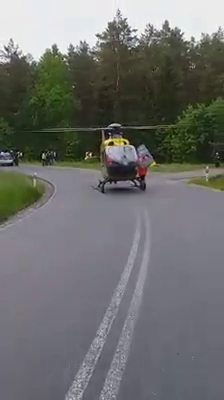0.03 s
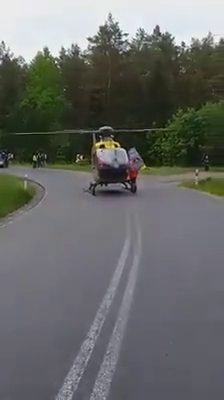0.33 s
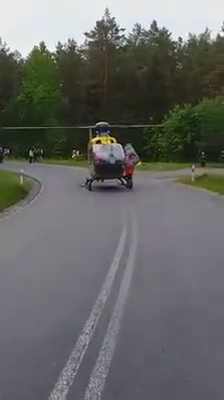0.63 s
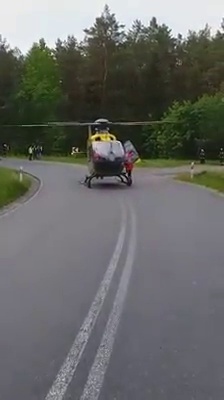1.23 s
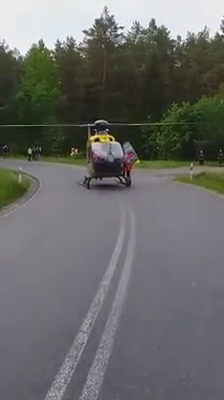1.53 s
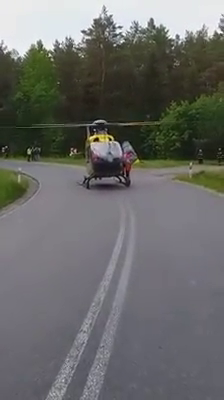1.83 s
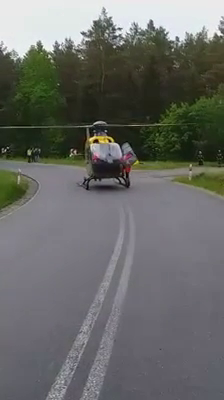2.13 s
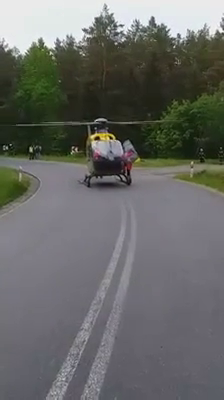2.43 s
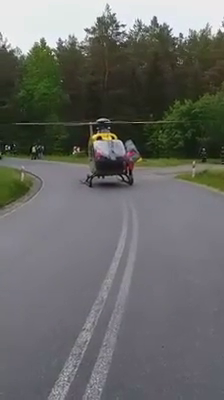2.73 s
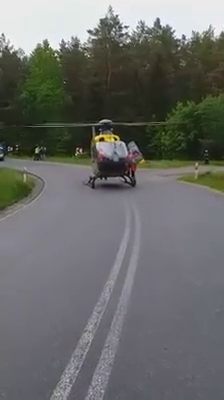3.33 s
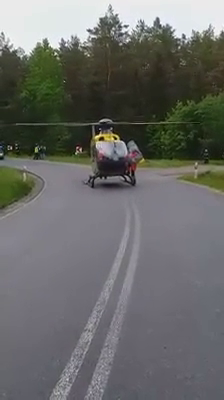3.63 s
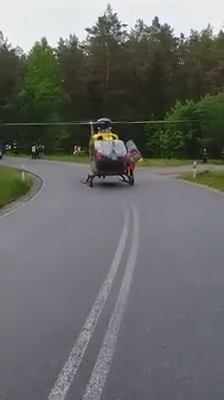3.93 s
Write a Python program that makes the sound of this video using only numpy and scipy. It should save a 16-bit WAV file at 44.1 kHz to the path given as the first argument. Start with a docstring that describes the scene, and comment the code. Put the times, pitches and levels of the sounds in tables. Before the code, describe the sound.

Loud helicopter rotor and thin turbine whine, suddenly dropping to a quiet, muffled rumble.

```python
"""A light helicopter runs on a forest road, its four-blade rotor slowly gaining speed.
Each passing blade makes the roar swell and adds a thud, over a low drone and a thin turbine whine.
After about a second a finger slides over the microphone port, the small hole that lets sound in.
The treble fades, the finger rubs and bumps, and then only a muffled rumble leaks past,
with a few small handling knocks."""
import sys
import numpy as np
from scipy import signal
from scipy.fft import rfft, irfft
from scipy.io import wavfile

SR = 44100
rng = np.random.default_rng(int(sys.argv[2]) if len(sys.argv) > 2 else 0)


def transcribe(signal):
    """Save signal, clipped to [-1, 1], as a 16-bit WAV file at the path in sys.argv[1]."""
    frames = np.atleast_2d(signal).T
    limited = np.clip(frames, -1, 1)
    pcm = np.round(limited * 32767).astype(np.int16)
    wavfile.write(sys.argv[1], SR, pcm)


N = 176400  # 4 seconds


# How fast the blades go by: time_s, passes_per_s
BLADE_SPEED = [(0, 24.0), (.75, 24.0), (1.2, 24.45), (1.8, 25.0), (2.5, 25.15), (3, 25.45), (4, 25.7)]

def rotor_spin():
    """The rotor speeds up. Gives the blade passes per second and a running count of passes."""
    rate, = in_time(BLADE_SPEED)
    first_pass = 0.3814  # share of a cycle before the first blade arrives
    return rate, np.cumsum(rate) / SR + 1 - first_pass


# How much each band of the roar swells as a blade passes (below zero, it dips): pitch_hz, swell_db
ROAR_SWELL = [(60, 1.5), (250, 6.5), (600, -2), (1100, 5.5), (2500, 1.5), (6000, 2), (14000, 2)]

def rotor(passes, spread_db=2.5, thud_db=-4.5):
    """Rushing noise jumps at each blade pass and sinks again, and each blade adds a low thud."""
    blade, phase = np.floor(passes).astype(int), passes % 1
    strength = from_db(spread_db * rng.standard_normal(blade.max() + 1))[blade]
    rise, fall = 0.016, 0.44  # shares of the time between two blades
    swell = (1 - np.exp(-phase / rise)) * np.exp(-phase / fall)
    swell = strength * swell / swell.max()
    noise_spectrum, hz = rfft(rng.standard_normal(N)), np.arange(N // 2 + 1) * SR / N
    centres_hz, roar = [f for f, _ in ROAR_SWELL], 0
    for (_, swell_db), this_band in zip(ROAR_SWELL, np.eye(len(ROAR_SWELL))):
        band = irfft(noise_spectrum * at_hz(np.c_[centres_hz, this_band], hz), N)
        roar = roar + band * rms_one(from_db(swell_db * swell))
    clicks = rms_one(np.diff(blade, prepend=blade[0]) * strength)  # one per blade
    thuds = cut(cut(clicks, 330, "low", order=4), 120, "high")
    return roar + from_db(thud_db) * thuds


# The low tones of the rotor: multiple_of_blade_rate, relative_level_db
DRONE_TONES = [(5, -30.5), (7, -32), (10, -31.5), (12, -32.5)]

def rotor_drone(passes):
    """The regular beat of the blades hums at whole multiples of the blade rate."""
    return sum(from_db(db) * np.sqrt(2) * np.sin(2 * np.pi * (round(multiple) * passes + rng.random()))
               for multiple, db in DRONE_TONES)


def turbine(rate, full_rate=25.4, full_pitch_hz=2666):
    """A thin, unsteady whine rises with the shaft speed and grows louder until full_rate is reached."""
    flutter_db = 3 * rms_one(cut(rng.standard_normal(N), 9, "low"))
    jitter_hz = 45 * rms_one(cut(rng.standard_normal(N), 40, "low"))
    missing_rate = np.maximum(full_rate - rate, 0)
    level_db = -15.5 + flutter_db - 11 * missing_rate
    pitch_hz = full_pitch_hz * rate / full_rate + jitter_hz
    return from_db(level_db) * np.sin(2 * np.pi * np.cumsum(pitch_hz) / SR)


# The tone of the helicopter through the open port: pitch_hz, relative_level_db
OPEN_TONE = [(25, -42.5), (36, -32.5), (48, -15), (62, -14), (85, -9), (120, -6), (170, -3.5), (205, -4),
             (270, 0.5), (330, -4.5), (430, -10.5), (500, -13), (610, -10), (770, -11), (1030, -2),
             (1200, -4), (1370, -10), (1560, -8.5), (1850, -12.5), (2300, -18), (3200, -18), (4500, -14.5),
             (5500, -18.5), (6300, -21.5), (7300, -23.5), (9000, -30), (12000, -67.5)]
# Where the treble ends as the finger closes in: time_s, cutoff_hz
TREBLE_EDGE = [(0, 8860), (.88, 8740), (.93, 7100), (1.1, 6300), (1.22, 5500), (1.28, 5900), (1.32, 5450),
               (1.4, 5000)]
# How far the treble is turned up or down: time_s, gain_db
TREBLE_GAIN = [(0, -1), (.4, 0), (.66, -1.5), (.74, 2), (1.2, -1), (1.295, 1), (1.315, -13), (1.4, -20)]
# The volume of the roar, dropping as the port shuts: time_s, gain_db
OPEN_GAIN = [(0, -14.5), (.35, -13.5), (.9, -14), (1.1, -12.5), (1.3, -13), (1.355, -13), (1.385, -16.5),
             (1.41, -33.5), (1.45, -59.5), (1.6, -74)]
# The tone of the hiss at the very top of the roar: pitch_hz, relative_level_db
HISS_TONE = [(7000, -21), (8700, 1.5), (9900, 1), (11200, 2.5), (16000, -0.5)]
# The volume of that hiss: time_s, gain_db
HISS_GAIN = [(0, -29.5), (.88, -28.5), (.95, -34.5), (1.2, -39.5), (1.28, -38.5), (1.37, -44.5),
             (1.41, -76), (1.6, -111)]

def open_port(sound, resonance=1.325, treble_from_hz=3280):
    """The full roar comes in, under a ringing treble edge that falls as the port closes."""
    roar = colour(sound, OPEN_TONE)
    edge_hz, = in_time(TREBLE_EDGE)
    filtered, state, block = np.zeros(N), np.zeros((2, 2)), 256
    for i in range(0, N, block):  # a low-pass filter, retuned for each block and applied twice
        angle = 2 * np.pi * edge_hz[i] / SR
        cos, loss = np.cos(angle), np.sin(angle) / (2 * resonance)
        lowpass = np.array([(1 - cos) / 2, 1 - cos, (1 - cos) / 2, 1 + loss, -2 * cos, 1 - loss])
        lowpass /= 1 + loss
        filtered[i:i + block], state = signal.sosfilt([lowpass, lowpass], roar[i:i + block], zi=state)
    filtered = rms_one(filtered)
    body = cut(cut(filtered, treble_from_hz, "low"), treble_from_hz, "low")
    treble = cut(cut(filtered, treble_from_hz, "high"), treble_from_hz, "high")
    treble *= from_db(in_time(TREBLE_GAIN)[0])
    hiss = colour(sound, HISS_TONE) * from_db(in_time(HISS_GAIN)[0])
    return (body + treble) * from_db(in_time(OPEN_GAIN)[0]) + hiss


# The tone of the helicopter through the finger: pitch_hz, relative_level_db
MUFFLED_TONE = [(22, -21.5), (34, -14.5), (48, -1), (62, 3.5), (88, 3), (125, -3.5), (200, -10.5),
                (261, -11.5), (370, -18.5), (480, -30.5), (630, -33), (770, -33.5), (950, -24), (1090, -19),
                (1320, -29.5), (1470, -23), (1870, -29), (2350, -39.5), (2700, -34), (3100, -37),
                (4100, -33.5), (5600, -42), (7600, -51), (9000, -61), (10800, -53), (12000, -53.5),
                (15800, -46)]
# How much leaks past the finger: time_s, rumble_gain_db, upper_gain_db
LEAK_GAINS = [(1.44, -28.5, -43.5), (1.61, -39, -52.5), (1.64, -40.5, -52.5), (1.72, -38.5, -54),
              (2.41, -46, -58), (2.65, -37.5, -51), (2.92, -33.5, -46), (3.51, -34, -45.5),
              (3.54, -32, -45.5), (3.96, -34.5, -45), (4.0, -31, -44.5)]

def covered_port(sound, split_hz=590, rumble_boost_db=2):
    """Mostly bass gets past the finger; more gets through when it eases off."""
    muffled = colour(sound, MUFFLED_TONE)
    rumble_db, upper_db = in_time(LEAK_GAINS)
    rumble = rms_one(cut(muffled, split_hz, "low", order=6)) * from_db(rumble_db + rumble_boost_db)
    upper = rms_one(cut(muffled, split_hz, "high", order=6)) * from_db(upper_db)
    fade_in, = in_time([(1.29, 0), (1.38, 1)])
    return fade_in * (rumble - upper)


# The tone of the finger rubbing: pitch_hz, relative_level_db
RUB_TONE = [(30, -32.5), (70, -12.5), (125, 9), (300, -1.5), (700, -7), (2000, -51.5)]

def finger_rub(middle_s=1.356, width_s=0.039, level_db=-15):
    """The finger makes a short, low rub as it closes the port."""
    t = np.arange(N) / SR
    swell = np.exp(-((t - middle_s) / width_s) ** 2 / 2)
    return colour(rng.standard_normal(N), RUB_TONE) * from_db(level_db) * swell


# Bumps of the hand on the microphone: start_s, strength_db, pitch_hz, tick_vs_knock_db
HAND_BUMPS = [(1.326, -0.5, 169, -30), (1.351, -2.5, 220, -18), (1.3586, -6, 210, 0.5),
              (1.396, -6.5, 220, -1), (1.548, -34, 300, 1), (1.741, -35.5, 523, -24),
              (1.773, -35.5, 520, -14), (1.903, -36, 520, -25), (2.174, -39, 550, -24.5),
              (3.254, -31, 450, -30), (3.526, -30, 520, -30), (3.5457, -11.5, 206, -14),
              (3.705, -25.5, 480, -30), (3.821, -25.5, 506, -30), (3.830, -27, 477, -24),
              (3.963, -36, 303, 8)]

def handling_knocks(ring_cycles=3.2, tick_s=0.00004, boost_db=2.5):
    """Each knock is a jump in pressure with a tiny tick; it rings out within a few cycles."""
    knocks, ticks = np.zeros((2, N))
    for start_s, strength_db, pitch_hz, tick_db in HAND_BUMPS:
        start = int(start_s * SR)
        age = np.arange(min(SR // 10, N - start)) / SR
        cycles = pitch_hz * age
        ring = from_db(strength_db - 60 * cycles / ring_cycles) * np.cos(2 * np.pi * cycles)
        cutoff_hz = 3800 * from_db(0.37 * strength_db)  # harder knocks are brighter
        knocks[start:start + len(age)] += cut(ring, cutoff_hz, "low")
        ticks[start:start + len(age)] += from_db(strength_db + tick_db) * np.exp(-age / tick_s)
    return from_db(boost_db) * (knocks + cut(ticks, [7000, 11000], "bandstop", order=1))


def from_db(db):
    """Turn decibels into a number to multiply by."""
    return 10 ** (np.asarray(db) / 20)


def rms_one(x):
    """Scale a signal so its average size (rms) is 1."""
    return x / np.sqrt(np.mean(x ** 2) + 1e-20)


def in_time(rows):
    """Join a table's rows with straight lines: one curve for each column after the time."""
    times_s, *columns = np.transpose(rows)
    return [np.interp(np.arange(N) / SR, times_s, column) for column in columns]


def at_hz(points, hz):
    """Read a table between its pitches, with every octave equally wide."""
    pitches_hz, values = np.transpose(points)
    return np.interp(np.log(np.maximum(hz, 1)), np.log(pitches_hz), values)


def colour(x, tone):
    """Turn each pitch up or down as a tone table says, then scale to rms 1."""
    hz = np.arange(N // 2 + 1) * SR / N
    return rms_one(irfft(rfft(x) * from_db(at_hz(tone, hz)), N))


def cut(x, hz, kind, order=2):
    """Filter: "low" keeps the lows, "high" keeps the highs, "bandstop" removes a band."""
    return signal.sosfilt(signal.butter(order, hz, kind, fs=SR, output="sos"), x + 1e-18)


def scene():
    """The helicopter reaches one microphone, first through the open port, then past the finger."""
    rate, passes = rotor_spin()
    helicopter = rotor(passes) + rotor_drone(passes) + turbine(rate)
    mono = open_port(helicopter) + covered_port(helicopter) + finger_rub() + handling_knocks()
    return np.array([mono, mono])


def record(dry, lowest_hz=36, highest_hz=15900, ceiling=0.95):
    """Cut the deepest bass, round off the biggest peaks, then cut the highest treble."""
    trimmed = cut(dry, lowest_hz, "high", order=4)
    rounded = trimmed / (1 + np.abs(trimmed / ceiling) ** 6) ** (1 / 6)
    return signal.sosfilt(signal.ellip(12, .1, 80, highest_hz, fs=SR, output="sos"), rounded)


dry = scene()
out = record(dry)
transcribe(out)
```